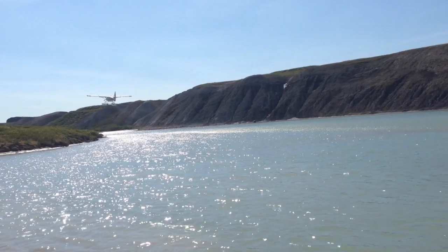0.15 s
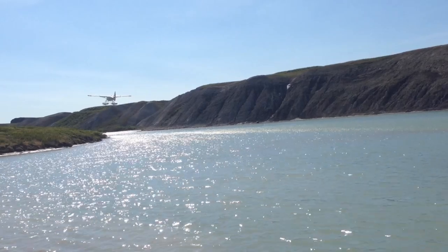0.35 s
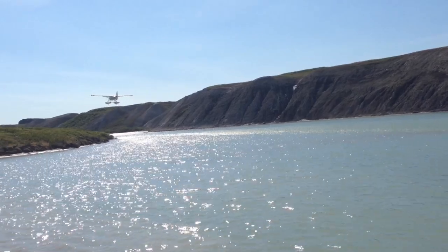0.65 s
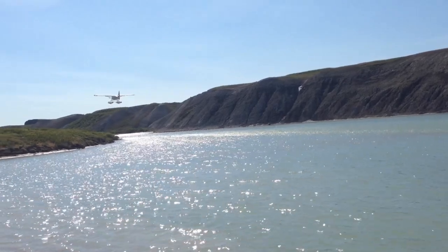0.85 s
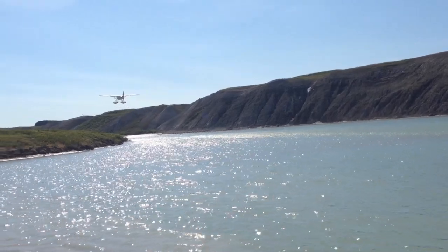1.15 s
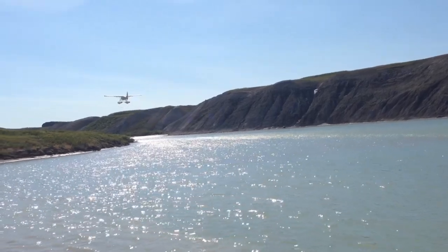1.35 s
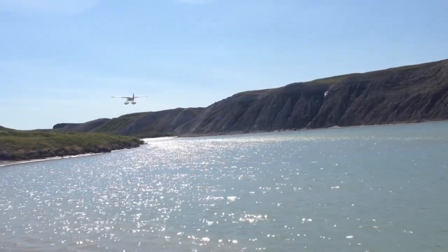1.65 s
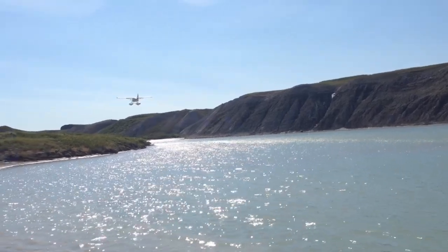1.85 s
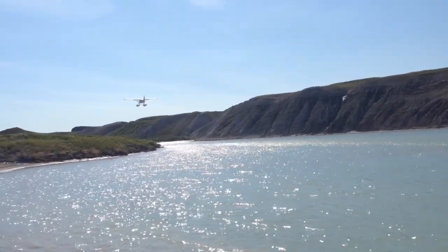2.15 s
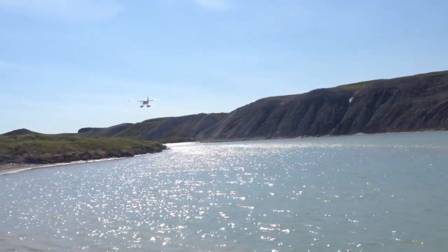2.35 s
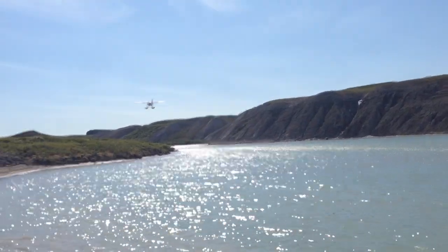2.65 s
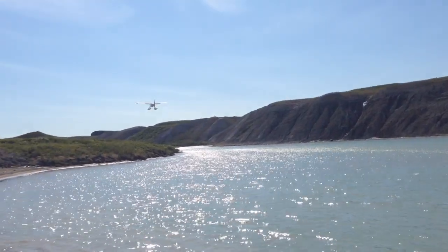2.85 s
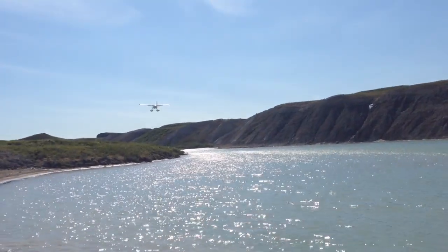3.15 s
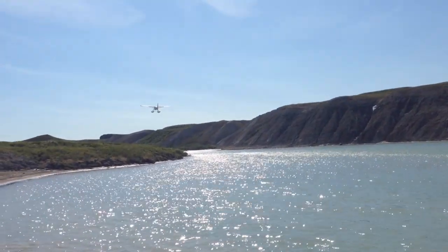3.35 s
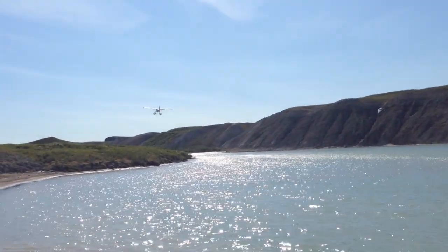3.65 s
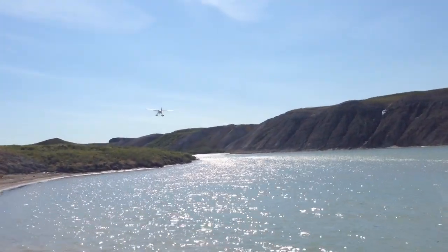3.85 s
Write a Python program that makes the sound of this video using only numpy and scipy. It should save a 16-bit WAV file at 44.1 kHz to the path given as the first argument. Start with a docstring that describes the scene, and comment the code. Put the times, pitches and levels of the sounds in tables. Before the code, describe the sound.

Outdoors at a riverside, a propeller plane flies away, its buzzing drone steadily weakening. Gusts buffet the handheld microphone in clusters, mostly early, over soft foam hiss, sharp little crackles and late water plips.

```python
"""A floatplane climbs away over a river. From the start its broad propeller and exhaust roar, noise in narrow
bands with faint wavering blade tones, fades and dulls, over a low wind rumble and the fizz of shore foam.
Sharp ticks of bursting foam, each with a puff of spray, soon join in, then gusts thump on the microphone:
both are very short bell-shaped bursts of a wave. Near the end a few drops plip in the same way."""
import sys
import numpy as np
from scipy import signal
from scipy.fft import rfft, irfft
from scipy.io import wavfile

SR = 44100
rng = np.random.default_rng(int(sys.argv[2]) if len(sys.argv) > 2 else 0)


def materialize(psi):
    """Save the field psi as 16-bit PCM at rate SR to the path in sys.argv[1].

    A 1-D psi becomes a single channel; in a 2-D psi each row is a channel.
    """
    bounded = np.clip(np.atleast_2d(psi).T, -1, 1)
    quanta = np.round(bounded * 32767).astype(np.int16)
    wavfile.write(sys.argv[1], SR, quanta)


N = 176400  # samples: 4 s


def from_db(db):
    """Turn decibels into a gain."""
    return 10 ** (np.asarray(db) / 20)


def rms_one(x):
    """Scale a sound to an average (rms) level of 1."""
    return x / np.sqrt(np.mean(x ** 2) + 1e-20)


def in_time(rows):
    """Draw straight lines between the rows of a table: each column gets one value per sample."""
    s, *columns = np.transpose(rows)
    return [np.interp(np.arange(N) / SR, s, column) for column in columns]


def at_hz(points, hz):
    """Read a colour table at any pitch, on a log-frequency axis."""
    table_hz, table_db = np.array(points).T
    return np.interp(np.log(hz), np.log(table_hz), table_db)


def drift(rate_hz):
    """Random wandering of spread 1: noise smoothed so that little is left above rate_hz."""
    step = 40  # the wandering is made at SR / 40, then joined up by straight lines
    r = np.exp(-2 * np.pi * rate_hz * step / SR)
    noise = rng.standard_normal(N // step + 2002)
    slow = signal.lfilter([1], [1, -2 * r, r * r], noise)[2000:]  # drop the filter's start-up
    return np.interp(np.arange(N) / step, np.arange(len(slow)), rms_one(slow - slow.mean()))


def bands():
    """Cut noise into twelfth-octave bands; neighbours come from separate noises, so they are unrelated."""
    edges = 150 * 2 ** (np.arange(76) / 12)
    white = rng.standard_normal((2, N + 8000))
    for k, (low, high) in enumerate(zip(edges, edges[1:])):
        sos = signal.butter(3, [low, high], "band", fs=SR, output="sos")
        yield np.sqrt(low * high), signal.sosfilt(sos, white[k % 2])[8000:]  # centre, noise


def coloured(x, spectrum):
    """Give a sound a fixed balance of low and high; rms 1."""
    hz = np.maximum(np.arange(N // 2 + 1) * SR / N, 1)
    return rms_one(irfft(rfft(x) * from_db(at_hz(spectrum, hz)), N))


def blips(s, db, hz, length, edge=0):
    """Short wave bursts that rise and fall like a bell; edge adds overtones that sharpen them."""
    out = np.zeros(N)
    turns = rng.random(len(s))  # each burst starts anywhere in its cycle
    for middle, gain, pitch, span, turn in zip(s, from_db(db), hz, length + 0 * s, turns):
        first = max(int((middle - 4 * span) * SR), 0)
        last = min(int((middle + 4 * span) * SR), N)
        i = np.arange(first, last)
        t = i / SR - middle
        phase = 2 * np.pi * (pitch * t + turn)
        wave = np.sin(phase) + edge * np.sin(2 * phase) + edge ** 2 * np.sin(3 * phase)
        out[i] += gain * np.exp(-.5 * (t / span) ** 2) * wave
    return out


# Colour of the roar when near: (f/Hz, level/dB per Hz)
NEAR_COLOUR = [(150, -39), (260, -10), (340, -10), (385, -12.5), (430, -2.5), (900, -4.5), (1050, -4.5),
               (1220, -17), (1330, -8), (1440, 0), (1700, -3.5), (1850, -10.5), (2050, -3), (2620, -7.5),
               (2850, -11), (3600, -18.5), (4000, -15.5), (5000, -27.5), (6250, -20.5), (7900, -20),
               (9500, -31.5), (11500, -79)]
# Colour of the roar when far: (f/Hz, level/dB per Hz)
FAR_COLOUR = [(150, -47), (260, -6.5), (340, -7), (420, -0.5), (660, -3), (735, -10), (922, -7), (1140, -9),
              (1500, -9), (2020, -8), (2650, -15.5), (2900, -19), (3460, -25), (3840, -25.5), (4860, -34),
              (6360, -29.5), (9000, -39.5), (11500, -47)]
# Three bands of the roar swell and sink: (t/s, low band level/dB, middle band level/dB, high band level/dB)
BAND_SWELLS = [(0, -5, -5, -2), (.17, -3, 1, 5.5), (.3, -6, -1, 4.5), (.42, 0, 1, 7), (.52, 5, 5, -2),
               (.67, 9, 3, 3), (.95, 2, -1, 3.5), (1.15, -1, 2.5, 7), (1.4, 0., 0, 1.5), (2.2, 1, -2.5, 2),
               (2.7, 4.5, -5, -1.5), (3.3, 1.5, 2, 5.5), (4, 2.5, 3.5, -5)]
# Centres of those three bands: (f/Hz)
SWELL_CENTRES = [1417, 1620, 2540]
SWELL_OCTAVES = 0.057  # distance from the centre at which a swell's dB shrink to 1/e
FLUTTER_DB, FLUTTER_HZ = 1.07, 12  # each band on its own
SHARED_DB, SHARED_HZ = 0.8, 3.24  # all bands together
RASP_DB = .9  # throb with each blade
AIR_CUT_HZ = 9400  # the roar is cut off steeply above this pitch


def roar(far, blade_phase):
    """Propeller and exhaust noise whose colour moves from near to far, flutters in the air and throbs."""
    swells_db = in_time(BAND_SWELLS)
    shared_db = SHARED_DB * drift(SHARED_HZ)
    noise, power = 0, 0
    for hz, band in bands():
        colour_db = (1 - far) * at_hz(NEAR_COLOUR, hz) + far * at_hz(FAR_COLOUR, hz)
        for centre, db in zip(SWELL_CENTRES, swells_db):
            colour_db = colour_db + db * np.exp(-(np.log2(hz / centre) / SWELL_OCTAVES) ** 2)
        gain = from_db(colour_db)
        if 700 < hz < 3000:  # these bands set the roar's level
            power = power + gain ** 2 * np.mean(band ** 2)
        noise = noise + gain * from_db(shared_db + FLUTTER_DB * drift(FLUTTER_HZ)) * band
    noise = signal.sosfilt(signal.butter(3, AIR_CUT_HZ, fs=SR, output="sos"), noise)
    return noise / np.sqrt(power) * from_db(RASP_DB * np.sin(blade_phase))


# Blade tones: (multiple of the blade rate, peak level/dB over the roar's level, before it wavers)
BLADE_TONES = [(1, -13), (2, -3), (4, -8.5), (5, -13.5), (6, -19.5)]
BLADE_FADE_DB, BLADE_FADE_HZ = 1.46, 17.0  # wavering of each tone's level


def blade_tones(blade_phase):
    """Pure tones at multiples of the rate at which the blades pass, each wavering in level."""
    tones = 0
    for multiple, db in BLADE_TONES:
        gain = from_db(db + BLADE_FADE_DB * drift(BLADE_FADE_HZ))
        tones = tones + gain * np.sin(multiple * blade_phase + 2 * np.pi * rng.random())
    return tones


# The plane: (t/s, level/dB of the roar from 700 to 3000 Hz, distance from near 0 to far 1)
FLIGHT = [(0, -37.5, 0.32), (.45, -33.5, 0.35), (.95, -39, 0.52), (1.7, -43, 0.71), (2.1, -43, 0.67),
          (2.6, -43, 0.84), (3.3, -46, 1.), (4, -48.5, 0.79)]
BLADE_HZ, BLADE_SAG_HZ_PER_S = 100.5, .6  # blade rate at the start, and how fast it sinks
BLADE_WOBBLE, WOBBLE_HZ = 0.0017, 2.2  # wobble as a share of the blade rate


def plane():
    """The blades' turning drives both the roar's throb and the tones; both follow the flight's level."""
    level_db, far = in_time(FLIGHT)
    blade_hz = BLADE_HZ - BLADE_SAG_HZ_PER_S * np.arange(N) / SR
    blade_hz = blade_hz * (1 + BLADE_WOBBLE * drift(WOBBLE_HZ))
    blade_phase = 2 * np.pi * np.cumsum(blade_hz) / SR
    return from_db(level_db) * (roar(np.clip(far, 0, 1), blade_phase) + blade_tones(blade_phase))


# Low wind rumble on the microphone, uneven and mostly sinking: (t/s, level/dB before the lumps)
BREEZE = [(0.0, -28.5), (0.12, -37.5), (0.3, -35), (0.46, -34), (0.67, -39), (0.92, -35.5), (1.11, -38.5),
          (1.75, -39.5), (1.94, -41), (2.45, -40), (2.62, -43.5), (2.9, -46.5), (3.23, -45), (3.43, -47.5),
          (3.88, -48.5), (4.0, -48)]
# Colour of the rumble: (f/Hz, level/dB per Hz, only the balance counts)
RUMBLE_COLOUR = [(30, -82), (60, -19), (90, -9.5), (130, 2.5), (200, 4.5), (260, -5.5), (340, -20),
                 (500, -46), (1500, -100)]
LUMPY_DB, LUMPY_HZ = 2, 20.0


def wind_rumble():
    """Low noise of wind on the microphone, made lumpy by a random wandering of its level."""
    breeze_db, = in_time(BREEZE)
    rumble = coloured(rng.standard_normal(N), RUMBLE_COLOUR)
    return from_db(breeze_db + LUMPY_DB * drift(LUMPY_HZ)) * rumble


FIZZ_PER_S = 500  # bubbles, before the swells and clumps
FIZZ_PITCHES, FIZZ_LOW_HZ, FIZZ_HIGH_HZ = 14, 4880, 15900
FIZZ_CYCLES = 40  # a bubble's ring dies by 60 dB in this many cycles
FIZZ_SPREAD_DB = 4.3  # scale of the random loudness of bubbles
# Wandering of the bubble rate (20 dB is ten times as many): slow, quick, and for each pitch alone
FIZZ_SWELL_DB, FIZZ_CLUMP_DB, FIZZ_PATCH_DB = 2.0, 5, 3.5


def fizz():
    """Tiny bubbles pop at random, in clumps; each pop rings one of a row of resonances."""
    sizes = from_db(FIZZ_SPREAD_DB * np.minimum(rng.exponential(1, N), 3.5)) * rng.choice([-1, 1], N)
    luck = rng.random(N)
    shared_db = FIZZ_SWELL_DB * drift(3.9) + FIZZ_CLUMP_DB * drift(60.0)
    dealt = rng.integers(0, FIZZ_PITCHES, N)  # which pitch a bubble gets
    total = 0
    for k, hz in enumerate(np.linspace(FIZZ_LOW_HZ, FIZZ_HIGH_HZ, FIZZ_PITCHES)):
        r = from_db(-60 * hz / (FIZZ_CYCLES * SR))
        w = 2 * np.pi * hz / SR
        born = luck < FIZZ_PER_S * from_db(shared_db + FIZZ_PATCH_DB * drift(20.0)) / SR
        pops = sizes * born * (dealt == k) + 1e-18
        total = total + rms_one(signal.lfilter([1, 0, -1], [1, -2 * r * np.cos(w), r * r], pops))
    return rms_one(total)


# Colour of the water, as the microphone hears it: (f/Hz, level/dB per Hz, only the balance counts)
WATER_COLOUR = [(2000, -32), (3800, -11), (5000, -5), (6500, -4.5), (8800, -0.5), (10500, -4.5),
                (12100, -8.5), (14000, -0.5), (15000, -3), (16000, -14)]
# Foam: (t/s, level/dB before the treble change, extra treble level/dB)
FOAM = [(0, -63.5, 0), (.3, -63, 0), (.9, -61.5, 0), (1.2, -56, -2), (1.6, -64, 3), (2.2, -65.5, 2),
        (2.7, -63.5, 1), (3.2, -62.5, 0.5), (3.6, -60.5, 1), (4, -59.5, 1)]
HISS_DB = -2.5  # smooth hiss compared with the fizz, before both are coloured
FOAM_TREBLE_HZ = 11500


def foam():
    """Fizz on a smooth hiss, with a treble that rises and falls apart from the rest."""
    wash = coloured(fizz() + from_db(HISS_DB) * rng.standard_normal(N), WATER_COLOUR)
    foam_db, treble_db = in_time(FOAM)
    high_pass = signal.butter(2, FOAM_TREBLE_HZ, "high", fs=SR, output="sos")
    treble = signal.sosfiltfilt(high_pass, wash)
    return from_db(foam_db) * (wash + (from_db(treble_db) - 1) * treble)


# Loudest ticks of bursting foam: (t/s, peak level/dB, f/Hz, bandwidth f/Hz)
TICKS = [(0.109, -35, 12700.0, 4600.0), (0.524, -37.0, 9100.0, 3900.0), (0.665, -38, 11800.0, 5800.0),
         (0.89, -43.0, 8100.0, 3800.0), (0.946, -36, 9300.0, 2100.0), (0.9744, -27, 11100, 2600.0),
         (1.0146, -36, 11300.0, 2800.0), (1.0906, -40, 8000, 1900.0), (1.1293, -42, 9000.0, 2700.0),
         (1.1821, -40, 8600.0, 1500.0), (1.1966, -32, 8750, 1600.0), (1.2471, -33, 9800.0, 4600.0),
         (1.2942, -28, 9050, 2600.0), (1.3129, -42.0, 9700.0, 2700.0), (1.332, -38, 9400, 1800.0),
         (1.385, -43, 7500.0, 2000.0), (1.5637, -31, 12500.0, 5500.0), (1.700, -43, 13800, 2500),
         (1.745, -38, 12500, 3500), (1.791, -44, 14300, 2500), (1.9782, -39, 9750, 2800.0),
         (2.044, -34.5, 12000.0, 4830), (2.4557, -36, 11900.0, 4400.0), (2.5577, -39.5, 8900.0, 2600.0),
         (2.7753, -35, 9750, 4300.0), (2.966, -40, 8300, 2700.0), (3.062, -36.5, 8500, 3800.0),
         (3.161, -36, 6950, 3500), (3.342, -39, 10500, 4000), (3.4433, -37, 11600.0, 3900.0),
         (3.5837, -38, 9900.0, 4100.0), (3.6679, -34.5, 9200, 4000.0), (3.6712, -40, 10100.0, 3200.0),
         (3.6834, -40.0, 14200.0, 2300.0), (3.765, -33.5, 8900.0, 2400.0), (3.800, -47, 13200, 2500),
         (3.8283, -41, 10700.0, 3700.0), (3.8308, -40, 13700.0, 2000.0), (3.8605, -42, 9100.0, 3300.0),
         (3.889, -34, 12000, 2200.0), (3.9745, -39, 12300.0, 3700.0), (3.9846, -35.0, 11800.0, 5200.0),
         (3.9887, -44.0, 10300.0, 2200.0)]
SPRAY_DB, SPRAY_S = -15, .0022  # level compared with its tick; time to fall to 1/e


def foam_ticks():
    """Bursting foam: very short bursts, each setting off a puff of spray noise that dies away."""
    s, db, hz, width_hz = np.transpose(TICKS)
    starts = np.zeros(N)
    starts[(s * SR).astype(int)] = from_db(db + SPRAY_DB)
    puffs = signal.lfilter([1], [1, -np.exp(-1 / (SPRAY_S * SR))], starts + 1e-18)
    spray = puffs * coloured(rng.standard_normal(N), WATER_COLOUR)
    return spray + blips(s, db, hz, 1 / (np.pi * width_hz))  # a wider band means a shorter tick


# Wind thumps: (t/s, level/dB of the main wave's peak, f/Hz)
THUMPS = [(0.254, -22, 271), (0.302, -16, 293), (0.311, -17.5, 229), (0.325, -23, 216), (0.363, -20.5, 204),
          (0.379, -25, 270), (0.392, -16.5, 228), (0.412, -26, 193), (0.420, -11, 193), (0.434, -14, 208),
          (0.449, -20, 188), (0.482, -14.0, 197), (0.58, -24, 167), (0.651, -15.5, 183), (0.697, -20, 275),
          (0.74, -23, 263), (0.766, -21, 169), (1.386, -22.5, 201), (1.413, -26, 170), (1.502, -26.5, 157),
          (1.513, -17, 180), (1.527, -19, 168), (1.54, -18.5, 192), (1.752, -26.5, 171),
          (1.762, -28.5, 223), (1.774, -25, 192), (1.801, -30, 192), (1.811, -21.5, 183), (1.825, -26, 226),
          (1.845, -23, 168), (1.963, -22, 210), (1.979, -28.5, 180), (2.016, -21.5, 185),
          (2.042, -24.5, 156), (2.059, -15.5, 273), (2.08, -23.5, 147), (2.096, -17.5, 290),
          (2.141, -29, 179), (2.189, -27.5, 257), (2.211, -28.0, 201), (2.346, -36, 170),
          (2.379, -22.5, 188), (2.418, -23.5, 179), (2.446, -27, 182), (2.476, -14.5, 223),
          (3.196, -27.5, 180), (3.276, -30.5, 149), (3.342, -28, 172)]
# Colour of the ragged rush around each thump: (f/Hz, level/dB per Hz, only the balance counts)
RUSH_COLOUR = [(40, -43), (90, -4.5), (140, 7), (330, -4.5), (600, -12.5), (1000, -36.5), (2000, -70),
               (4000, -110)]
RUSH_DB, RUSH_S = -13, 0.01  # level compared with its thump; width of its bell
THUMP_CYCLES, THUMP_EDGE = 0.63, 0.2  # half-length of a thump; share of overtone that sharpens it


def wind_thumps():
    """Gusts press on the microphone: deep thumps, each in a short ragged rush of air."""
    s, db, hz = np.transpose(THUMPS)
    t = np.arange(N) / SR
    gust_power = 0
    for middle, peak_db in zip(s, db):
        gust_power = gust_power + from_db(2 * (peak_db + RUSH_DB)) * np.exp(-((t - middle) / RUSH_S) ** 2)
    rush = np.sqrt(gust_power) * coloured(rng.standard_normal(N), RUSH_COLOUR)
    return rush + blips(s, db, hz, THUMP_CYCLES / hz, THUMP_EDGE)


# Drops: (t/s, peak level/dB, f/Hz, half-length t/s)
DROPS = [(3.588, -33.5, 2110, .0006), (3.5885, -40, 3300, 0.00036), (3.667, -46, 4900, .0006),
         (3.671, -33, 1940, 0.0012), (3.7073, -22, 1834, 0.0009), (3.7122, -29, 1530, 0.00052),
         (3.814, -33.5, 2900, 0.00013), (3.894, -44, 4700, .0002)]


def drops():
    """Each plip is one or more tiny pitched bursts."""
    return blips(*np.transpose(DROPS))


def scene():
    """Plane, wind and water at one microphone."""
    return (plane() + wind_rumble() + foam() + foam_ticks() + wind_thumps() + drops())[None]


CUTOFF_HZ = 15850


def record(dry):
    """A steep filter cuts off the top of the sound."""
    return signal.sosfilt(signal.ellip(12, .3, 60, CUTOFF_HZ, fs=SR, output="sos"), dry)


dry = scene()
out = record(dry)
materialize(out)
```